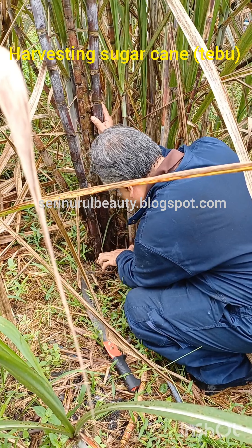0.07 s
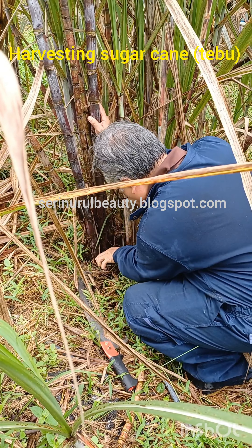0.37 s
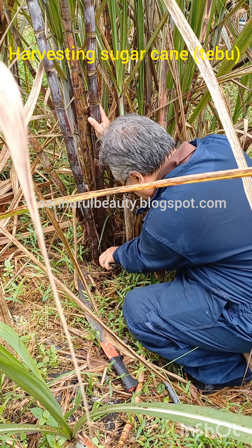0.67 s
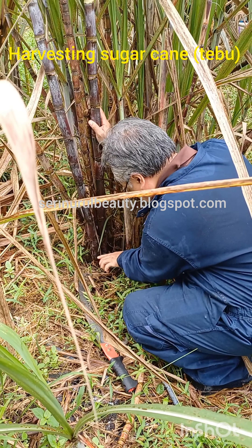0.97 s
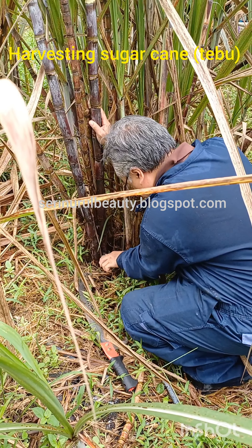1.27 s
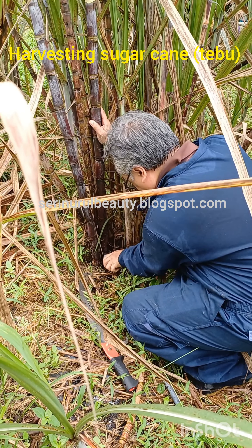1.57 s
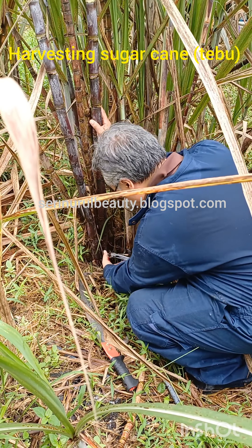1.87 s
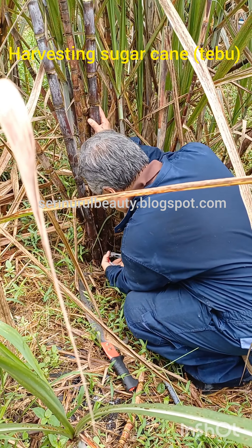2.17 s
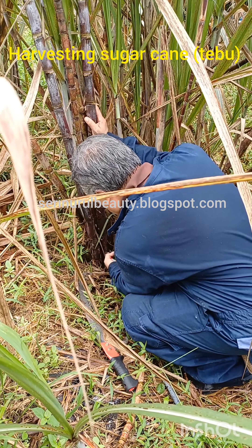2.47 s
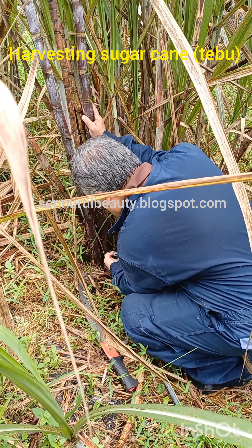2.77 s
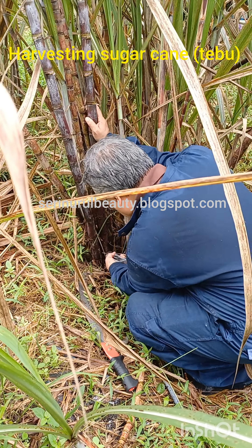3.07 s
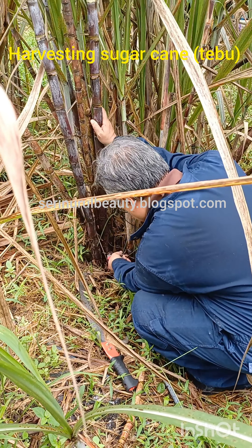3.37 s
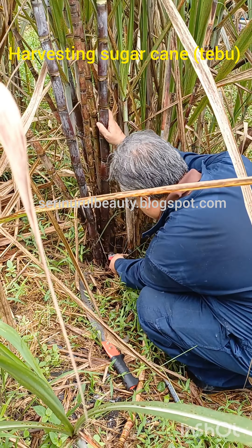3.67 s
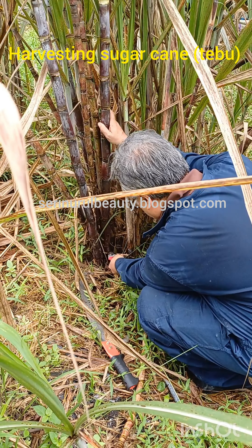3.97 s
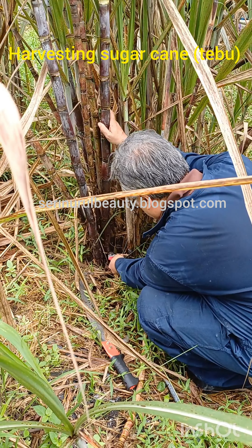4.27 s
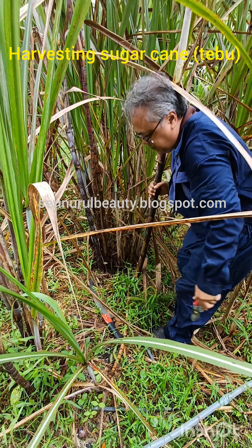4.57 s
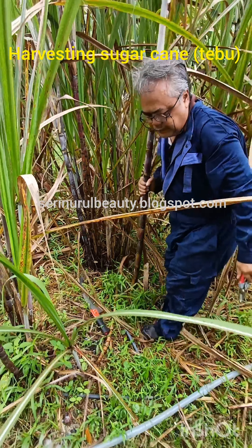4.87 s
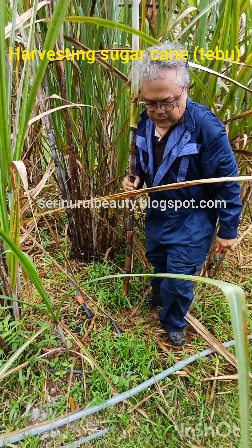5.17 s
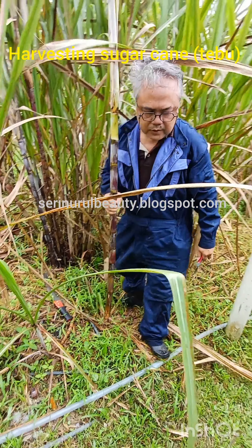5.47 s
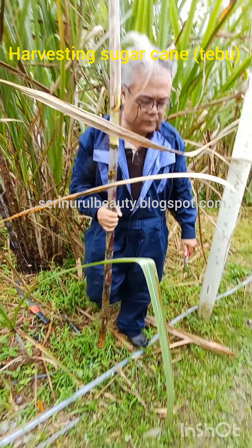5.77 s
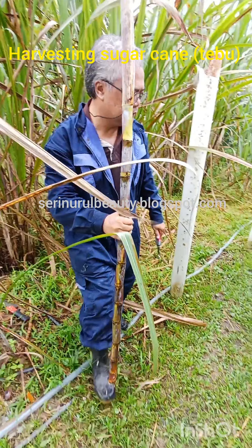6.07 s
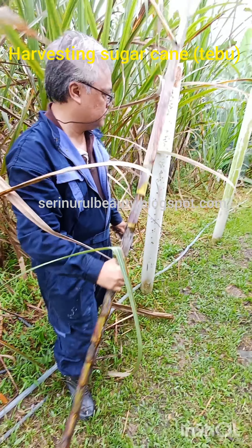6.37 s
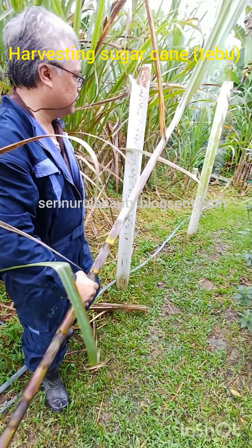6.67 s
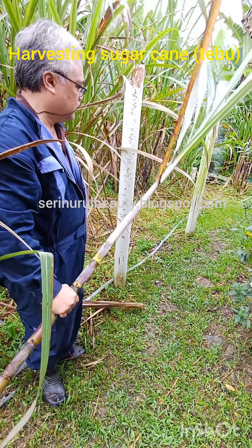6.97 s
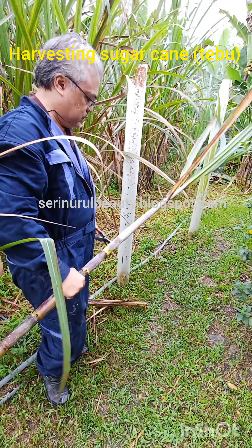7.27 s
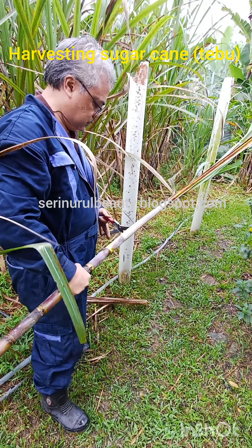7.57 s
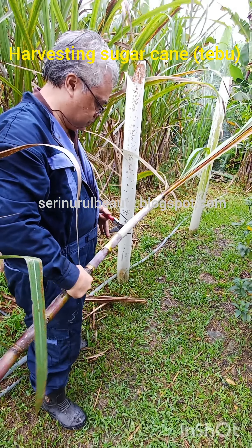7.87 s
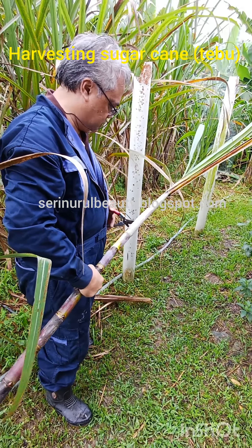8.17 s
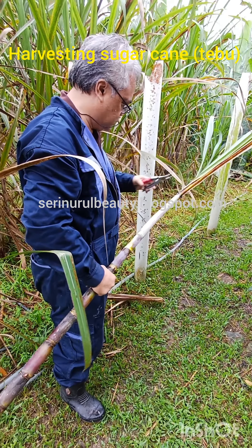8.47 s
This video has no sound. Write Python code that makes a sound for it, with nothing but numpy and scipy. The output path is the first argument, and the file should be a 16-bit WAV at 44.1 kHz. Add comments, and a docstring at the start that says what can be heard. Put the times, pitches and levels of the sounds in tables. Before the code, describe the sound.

Outdoors, distant traffic and engines rumble softly in a light wind throughout, under a faint high hiss of insects. Close by, dry sugar cane leaves stir quietly, and hand shears give small clicks around 0.5 and 1.4 seconds. A small bird chirps at about 0.5, 1.7 and 2 seconds. At 2.5 seconds the stalk cracks loudly with a brief woody ring and a burst of rustling. Fibres crunch near 2.9 seconds, and more sharp snaps come at about 3.5, 3.8 and 4.1 seconds, with a smaller one at 4.6. From about 4 to 7 seconds the long dry leaves scrape, hiss and crackle in uneven swells, slightly to the left, as the cane is pulled out and carried off. The rustle then thins to light brushes and scattered ticks, with a faint falling bird call near 8.3 seconds.

```python
"""Outdoors at a clump of sugar cane, on a stereo pair of microphones. Close by, a cane is cut at the foot
with hand shears and pulled out: the blades click, the stalk cracks fibre by fibre and rings briefly,
and its long dry leaves stick, slip and crackle past their neighbours as it is carried off over grass.
Around it small birds whistle and insects hiss; far traffic rumbles in a light wind."""
import sys
import numpy as np
from scipy import signal
from scipy.fft import rfft, irfft, next_fast_len
from scipy.io import wavfile
from scipy.ndimage import uniform_filter1d, map_coordinates

SR = 44100
rng = np.random.default_rng(int(sys.argv[2]) if len(sys.argv) > 2 else 0)


def pcm_store(signal):
    """Save signal as 16-bit PCM."""
    levels = np.round(np.clip(np.atleast_2d(signal), -1, 1) * 32767)
    wavfile.write(sys.argv[1], SR, levels.astype(np.int16).T)


N = 384552

# Spectra of a dry leaf's crack and of fine splinters. Each row: frequency in Hz, relative level in dB.
CRACK_SPECTRUM = [(250, -46), (600, -8), (1400, 3.5), (2400, -2), (4300, 1), (6200, 0.5), (8500, 2.5),
                  (16000, -20)]
SPLINTER_SPECTRUM = [(3000, -28), (6500, -7), (8500, -1), (12000, 0), (16000, 0)]


def amp(db):
    return 10 ** (np.asarray(db) / 20)


def unit_rms(x):
    return x / np.sqrt(np.mean(x ** 2) + 1e-20)


def unit_energy(pair):
    """A stereo hit scaled so that its mid has unit energy."""
    return pair / np.linalg.norm(pair.mean(0))


def along(points, hz):
    """Rows of (Hz, value) interpolated on a log frequency axis."""
    knots_hz, values = np.transpose(points)
    return np.interp(np.log(hz + 1), np.log(knots_hz + 1), values)


def curves(rows):
    """One value per sample for each column after the time."""
    times, *columns = np.transpose(rows)
    return [np.interp(np.arange(N) / SR, times, column) for column in columns]


def noise(size=N):
    """Two unrelated white noises."""
    return rng.standard_normal((2, size))


def wobble(rate):
    """A smooth random curve, rate knots a second."""
    return map_coordinates(rng.standard_normal(int(N * rate / SR) + 4), [np.arange(N) * rate / SR])


def swell(peak_s, rise, fall):
    """A gain that builds to 1 at peak_s and dies away."""
    drop_db, roundness = 5.5, 1.51  # the drop is reached one rise or fall time from the peak
    t = np.arange(N) / SR - peak_s
    away = np.minimum(np.abs(t) / np.where(t < 0, rise, fall), 10)
    return amp(-drop_db * away ** roundness)


def add(track, start, sound):
    """Mix a sound into a track at start seconds."""
    part = track[..., max(round(start * SR), 0):][..., :sound.shape[-1]]
    part += sound[..., :part.shape[-1]]


def filtered(x, response):
    """x through a response given as a function of Hz."""
    size = x.shape[-1]
    padded = next_fast_len(size + 8192)
    return irfft(rfft(x, padded) * response(np.fft.rfftfreq(padded, 1 / SR)), padded)[..., :size]


def resonance(x, hz, q):
    """x through one damped resonance of stalk or leaf."""
    return filtered(x, lambda f: 1j * f * hz / q / (hz * hz - f * f + 1j * f * hz / q))


def struck(x, spectrum, size=1024):
    """x through a causal filter of unit energy, so that attacks stay sharp."""
    cepstrum = irfft(np.log(amp(along(spectrum, np.fft.rfftfreq(size, 1 / SR)))))
    causal = 2 * cepstrum[:size // 2] * (np.arange(size // 2) > 0)
    response = irfft(np.exp(rfft(causal, size)))
    return signal.fftconvolve(x, response[None] / np.linalg.norm(response), axes=1)[:, :x.shape[1]]


def spread(pair, spectrum):
    """Two unrelated signals become one coloured stereo sound, wider towards the treble."""
    # How alike the microphones hear it. Each row: frequency in Hz, likeness from 0 to 1.
    likeness = [(60, .98), (150, .96), (350, .75), (1400, .75), (3000, .6), (6000, .45), (12000, .35)]
    # Its balance. Each row: frequency in Hz, left minus right in dB.
    balance = [(60, -4), (110, -1), (200, -4), (380, -7), (700, -2), (1290, -11), (2380, -5.5), (4400, -5),
               (8120, -0.5), (15000, 7.5)]

    def mid_and_side(hz):
        angle = np.arccos(np.clip(along(likeness, hz), -1, 1)) / 2
        return amp(along(spectrum, hz)) * [np.cos(angle), np.sin(angle)]

    mid, side = filtered(pair, mid_and_side)
    stereo = np.array([mid + side, mid - side]) / np.std(mid)
    return filtered(stereo, lambda hz: amp(along(balance, hz) * np.array([[.5], [-.5]])))


def traffic_and_wind():
    """Far traffic rumbles under the soft roar of road and wind."""
    # Each row: time in seconds, relative levels of rumble and roar in dB.
    levels = [(0, -43, -48), (2.9, -40, -47.5), (3.2, -44, -48.5), (4.6, -42.5, -45), (5.6, -41, -46),
              (6.3, -44.5, -47), (8.72, -43.5, -50)]
    # Their spectra. Each row: frequency in Hz, relative level in dB.
    rumble_spectrum = [(20, -34), (32, -25), (48, -1), (75, 0), (105, 0), (160, -4), (230, -13), (400, -40),
                       (900, -90)]
    roar_spectrum = [(25, -9), (80, -5), (230, 1.5), (400, -4.5), (620, -10.5), (1000, -14), (1500, -24.5),
                     (2500, -34), (6000, -75), (16000, -45)]
    rumble_db, roar_db = curves(levels)
    rumble = amp(rumble_db - 1.0 + 0.87 * wobble(8.6)) * spread(noise(), rumble_spectrum)
    roar = amp(roar_db - 0.5 + .8 * wobble(4)) * spread(noise(), roar_spectrum)
    return rumble + roar


def engine(course, orders, waver_db, drift):
    """A far engine: multiples of its firing rate, each wavering on the way through the air."""
    firing_hz, level_db = curves(course)
    phase = 2 * np.pi * np.cumsum(firing_hz * (1 + drift * wobble(8))) / SR
    return sum(amp(level_db + db + waver_db * wobble(4)) * np.sin(k * phase) for k, db in orders)


def far_engines():
    """One engine idles and fades; a second comes up and gathers speed."""
    # Their courses. Each row: time in seconds, firing rate in Hz, gain in dB.
    idling = [(0, 52.41, 2), (2.2, 52.5, 1), (3.3, 52.27, -3.5), (5.3, 51.9, 0.5), (6.5, 52.13, -9.5),
              (8.72, 51.85, -13)]
    passing = [(0, 63.6, -20), (4, 63.98, -16), (6.5, 64.3, 1), (7.4, 65.33, 0.5), (8.1, 66.5, 0),
               (8.72, 68.6, 1.5)]
    # Their tones. Each row: multiple of the firing rate, level in dB before that gain.
    idling_orders = [(1.5, -49.5), (2, -48.5), (3, -55.5), (4, -59.5), (5, -58.5), (7, -69.5), (8, -59)]
    passing_orders = [(2, -48), (3, -60), (4, -58.5), (5, -56.5), (6, -59.5), (7, -57.5)]
    return (engine(idling, idling_orders, waver_db=3.5, drift=0.00385)
            + engine(passing, passing_orders, waver_db=3.0, drift=0.00401))


def drone(hz=159):
    """A low, unsteady tone swells and fades twice."""
    # Each row: time of the peak, rise and fall in seconds, level in dB.
    swells = [(1.9, 1.1, 0.74, -45), (4.5, 0.14, 0.31, -41)]
    level = sum(amp(db) * swell(peak_s, rise, fall) for peak_s, rise, fall, db in swells)
    level *= amp(2.5 * wobble(9))
    pitch_hz = hz * (1 + 0.0203 * wobble(16))
    return level * np.sin(2 * np.pi * np.cumsum(pitch_hz) / SR)


def insects():
    """Insects hiss steadily in two high bands."""
    # Each row: time in seconds, level in dB.
    levels = [(0, -69), (2.4, -69), (7, -70), (8.72, -71)]
    # Each row: frequency in Hz, relative level in dB.
    spectrum = [(3000, -48), (4400, -10.5), (6000, -23), (6600, -29), (7250, -2), (7800, -0.5), (8500, -27),
                (11000, -55)]
    level_db, = curves(levels)
    return amp(level_db + 0.92 * wobble(25)) * spread(noise(), spectrum)


def bird(calls, contour, echo_db, flutter_db, echo_t60=0.44):
    """Gliding whistles with a flutter, smeared by echoes from the field's edge."""
    song = np.zeros(N)
    share, glide, glide_db = np.transpose(contour)
    for start, length, top_hz, end_hz, db in calls:
        progress = np.linspace(0, 1, int(length * SR))
        hz = end_hz + (top_hz - end_hz) * uniform_filter1d(np.interp(progress, share, glide), size=300)
        level = amp(db + np.interp(progress, share, glide_db)) * signal.windows.tukey(len(progress), .15)
        add(song, start, level * np.sin(2 * np.pi * np.cumsum(hz) / SR))
    song *= amp(flutter_db * wobble(250))
    t = np.arange(SR // 2) / SR
    tail = noise(len(t)) * amp(-60 * t / echo_t60)
    echo = signal.fftconvolve(song[None], tail / np.linalg.norm(tail[0]), axes=1)[:, :N]
    return song * amp([[-1], [1]]) + amp(echo_db) * echo


def birds():
    """A near bird's arched chirps and a far bird's falling calls."""
    # Each row: start and length in seconds, top and end pitch in Hz, relative level in dB.
    near_chirps = [(0.543, 0.083, 4460, 2860, -56), (1.73, 0.08, 4360, 2650, -53.5),
                   (2.039, .086, 4610, 2670, -51)]
    far_calls = [(1.215, .10, 5900, 3950, -68), (8.295, .115, 5800, 3450, -70)]
    # One call's shape. Each row: share of its length, pitch from end (0) to top (1), gain in dB.
    arched = [(0, -.15, -22), (.17, .48, -3), (.32, .92, -3), (.43, 1, -1), (.56, .55, -1), (.68, .18, -5),
              (.84, .04, -3), (1, -.04, -16)]
    falling = [(0, .75, -14), (.25, 1, -10), (.4, .95, -7), (.6, .5, 0), (.8, .15, -3), (1, 0, -12)]
    return (bird(near_chirps, arched, echo_db=1, flutter_db=4.5)
            + bird(far_calls, falling, echo_db=5, flutter_db=5))


def rustle_levels():
    """Scrape and hiss in dB: the power of every stroke of leaf over leaf adds to the stir of the clump."""
    # The shaken clump stays astir, then settles as the cane is carried off.
    # Each row: time in seconds, relative levels of scrape and hiss in dB.
    stir = [(0, -83, -72.5), (2.4, -75, -64.5), (2.55, -62, -63), (4.5, -53.5, -74), (7, -61, -53.5),
            (7.5, -62, -60.5), (8.3, -74.5, -65.5), (8.72, -78, -70)]
    # Each row: time of the peak, rise and fall in seconds, relative scrape in dB, hiss over it in dB.
    strokes = [(0.02, 0.057, .15, -59.5, -3.5), (0.34, 0.075, 0.061, -64.5, -2),
               (0.62, 0.24, 0.11, -62, -5.5), (1.37, 0.16, 0.11, -63, -5), (1.7, 0.034, 0.14, -59.5, -6),
               (2.35, .2, 0.19, -64.5, -6), (2.5, 0.014, 0.11, -43, -0.5), (2.63, 0.042, 0.085, -45, 0.5),
               (2.92, 0.16, 0.026, -52, 1), (3.32, 0.27, .18, -54, 2), (4.01, 0.18, 0.12, -41, 2),
               (4.36, 0.21, 0.033, -47.5, 4), (4.6, 0.097, 0.16, -50.5, 5), (4.75, 0.019, 0.015, -46, 4),
               (4.98, 0.29, 0.23, -52, 3), (5.57, 0.28, 0.24, -46.5, 6.5), (6.15, 0.13, 0.14, -50.5, 7),
               (6.46, 0.066, 0.031, -49, 5.5), (6.74, 0.19, 0.16, -54.5, 4), (7.22, 0.079, .12, -56.5, 1),
               (7.56, 0.069, 0.043, -60, 7), (7.72, .015, 0.036, -62, 12), (7.859, 0.037, 0.027, -55, 3.5),
               (8.56, 0.016, 0.019, -67, 8.5), (8.7, .06, .05, -63.5, 5.5)]
    scrape, hiss = amp(curves(stir)) ** 2
    for peak_s, rise, fall, db, bright_db in strokes:
        power = (amp(db) * swell(peak_s, rise, fall)) ** 2
        scrape += power
        hiss += power * amp(bright_db) ** 2
    uneven_db = 1.6 * wobble(22)  # leaves catch and let go
    return 10 * np.log10(scrape) + uneven_db, 10 * np.log10(hiss) + uneven_db


def slips(rate, scatter_db, life_s, smooth_share):
    """Tiny stick-slip releases of uneven size, rate a second, over a share of smooth sliding."""
    sizes = amp(scatter_db * np.minimum(rng.standard_normal(N), 2))
    releases = (rng.random(N) < rate / SR) * sizes ** 2
    energy = signal.lfilter([1], [1, -np.exp(-1 / (life_s * SR))], releases) / rate
    return noise() * np.sqrt(smooth_share + (1 - smooth_share) * energy / energy.mean())


def patchy(pair, depth_db):
    """Each stretch of leaf rubs with its own colour."""
    spectra = signal.stft(pair, nperseg=512)[2]
    patches = uniform_filter1d(rng.standard_normal(spectra.shape[1:]), size=8, axis=0)
    patches = uniform_filter1d(patches, size=12, axis=1)
    return signal.istft(spectra * amp(depth_db * unit_rms(patches)), nperseg=512)[1][:, :N]


def sliding_leaves(scrape_db, hiss_db, flex_db=-8.5):
    """Rough leaves bend and slide over each other: the harder the pull, the denser the slips."""
    # Each row of these spectra: frequency in Hz, relative level in dB.
    scrape_spectrum = [(700, -10.5), (1300, -5.5), (1900, 2.5), (3000, 1.5), (4300, 3), (6000, -7),
                       (7500, -13), (10000, -23), (16000, -51)]
    hiss_spectrum = [(3000, -20), (6500, -6.5), (9500, -7), (12300, -2), (13700, -2), (15600, 2),
                     (17000, -14.5)]
    flex_spectrum = [(250, -2), (550, -2), (900, 2.5), (1350, -20), (2000, -21), (4000, -52)]
    # The leaves pass nearer the left microphone. Each row: time in seconds, its lead in seconds.
    left_lead = [(0, 0), (3.6, 0), (4.1, .00045), (6.2, .00042), (7.2, .00027), (8.72, .0002)]
    slip_rate = 1000 * amp(.4 * np.clip(scrape_db + 50, -12, 10))
    friction = slips(slip_rate, scatter_db=4.5, life_s=.0015, smooth_share=.5)
    scrape = amp(scrape_db - 2.82) * spread(patchy(friction, depth_db=0.84), scrape_spectrum)
    hiss = amp(hiss_db - 0.4) * spread(patchy(friction, depth_db=0.94), hiss_spectrum)
    bending = slips(slip_rate, scatter_db=5.0, life_s=.004, smooth_share=0.41)
    flex = amp(scrape_db + flex_db) * spread(bending, flex_spectrum)
    left, right = scrape + hiss + flex
    lead_s, = curves(left_lead)
    lead_s *= 1 + .22 * wobble(40)  # contacts hop from leaf to leaf
    return np.array([left, map_coordinates(right, [np.arange(N) - lead_s * SR], order=5)])


def leaf_crackle(hiss_db, per_second=22, t60=0.018):
    """Now and then a sliding leaf buckles with a tiny crack of its own."""
    buckles = (rng.random(N) < per_second / SR) * amp(4 * np.minimum(rng.standard_normal(N), 1.5))
    decay = amp(-60 * np.arange(600) / SR / t60)
    grains = noise() * signal.fftconvolve(buckles, decay)[:N]
    return amp(hiss_db + 4) * (struck(grains, SPLINTER_SPECTRUM) + .7 * struck(grains, CRACK_SPECTRUM))


def fracture(t60, tail_db, tail_t60, size=6000):
    """A spiky burst, then its scatter off the ground and nearby stalks."""
    t = np.arange(size) / SR
    spikes = (noise(size)[0] + .95 * noise(size)) * amp(3.5 * rng.standard_normal(size))
    scatter = noise(size) * amp(tail_db - 60 * t / tail_t60)
    return unit_energy(spikes * amp(-60 * t / t60) + scatter)


def leaf_ticks():
    """Stiff, dry leaf edges catch and flick free."""
    # Each row: start in seconds, relative level and relative treble in dB, left minus right in dB.
    flicks = [(0.4192, -38, -22, -8), (1.679, -46, -3, 7), (2.158, -35, -8, 2.5), (2.457, -26, -14, -2.5),
              (2.5365, -17.5, -13, 2), (2.8264, -21.5, -10, 1), (3.7873, -19, -14, -1),
              (3.8238, -17, -15, 3), (5.4, -29, -3, -3), (5.7015, -30.5, -7, 15), (6.197, -25.5, -2, -9),
              (6.244, -25, -14, -5), (6.8777, -43, 0, 0.5), (6.9906, -39, -1, 0), (7.345, -37.5, -6, -10),
              (7.5184, -44, -6, -0.5), (8.05, -37, -12, -8), (8.3713, -39, -15, -16)]
    out = np.zeros((2, N))
    for start, db, treble_db, pan_db in flicks:
        flick = fracture(t60=.008, tail_db=-22, tail_t60=.05)
        tick = struck(flick, CRACK_SPECTRUM) + amp(treble_db + 14.5) * struck(flick, SPLINTER_SPECTRUM)
        add(out, start, amp(db + 5.5) * tick * amp([[pan_db / 2], [-pan_db / 2]]))
    return out


def fibre_crunches():
    """Fibres are crushed and leaf edges rasp: many give way within a moment, in one broad resonance."""
    # Each row: time of the peak and length in seconds, centre in Hz, relative level in dB.
    crunches = [(1.432, 0.014, 2000, -50), (1.694, 0.036, 2330, -49), (2.83, 0.014, 2370, -42),
                (2.878, 0.012, 1840, -37.5), (2.874, 0.011, 4600, -33.5), (2.939, .012, 2000, -50),
                (5.489, 0.02, 910, -43), (5.584, 0.1, 3020, -50), (6.071, 0.17, 2050, -51.5),
                (6.468, 0.03, 2200, -49.5), (7.791, 0.0064, 8950, -46.5), (8.065, 0.015, 2700, -50.5)]
    out = np.zeros((2, N))
    t = np.arange(-SR // 4, SR // 4) / SR
    for peak_s, length, hz, db in crunches:
        fibres = (noise(len(t))[0] + 2.3 * noise(len(t))) * amp(5.5 * rng.standard_normal(len(t)))
        crunch = unit_rms(resonance(resonance(fibres, hz, q=2.2), hz, q=0.11))
        envelope = np.exp(-(t / length / np.where(t < 0, .45, .9)) ** 2)  # rises faster than it settles
        add(out, peak_s + t[0], amp(db) * crunch * envelope)
    return out * amp([[-2], [1.5]])


def stalk_ring(size=6000):
    """The stalk's modes, a little different at each crack and at each microphone."""
    # Each row: frequency in Hz, relative level in dB, seconds to fall by 60 dB.
    modes = [(525, -7, 0.076), (1228, -7.5, 0.11), (1580, -13.5, 0.068), (1750, -3.5, 0.036),
             (1960, 6, 0.019), (2145, -5, 0.057), (3100, -12, 0.062), (3610, -16, .05), (3920, -11, .06),
             (6210, -24, 0.031)]
    t = np.arange(size) / SR
    ring = np.zeros((2, size))
    for hz, db, t60 in modes:
        envelope = amp(db + 2 * rng.standard_normal() - 60 * t / t60)
        ring += envelope * np.sin(2 * np.pi * hz * t + 0.58 * rng.standard_normal((2, 1)))
    return unit_energy(ring)


def cane_cracks():
    """Each crack of stalk or shears knocks and rings the cane, snaps its hard rind and throws splinters."""
    # Each row: start in seconds, knock in Hz and dB, snap in Hz and dB, splinters in dB,
    # seconds for the burst to fall by 60 dB. Levels are relative.
    cracks = [(0.442, 1530, -14.5, 5270, -11, -18, 0.013), (0.4955, 1310, -18, 4440, -18.5, -42, 0.028),
              (0.5438, 1950, -17, 4430, -17, -28, 0.022), (0.642, 1340, -16.5, 4260, -24, -26, 0.054),
              (1.413, 1800, -20, 4230, -17.5, -26, 0.01), (1.4284, 1790, -18, 4700, -22.5, -26, 0.01),
              (2.4765, 2130, 4.5, 3450, -7, -6, 0.023), (2.4802, 1850, 4, 3600, 2, -2, 0.046),
              (2.5164, 2040, -2.5, 4400, -9, -10, 0.039), (3.3824, 1480, -18, 6060, -6.5, -34, 0.031),
              (3.459, 2230, -8.5, 4500, -13, -5.5, 0.069), (3.462, 2350, -7.5, 3850, 2, -16, 0.014),
              (3.7649, 2020, -6.5, 4700, -16, -14, 0.026), (3.7701, 1960, -2.5, 3370, -2.5, -34, 0.0084),
              (4.0987, 2220, 0, 4500, 5, -23, 0.0089), (4.101, 2110, -3.5, 7050, 1, -2, 0.028),
              (4.567, 1130, -11.5, 4200, -15, -8, 0.045), (7.1878, 1877, -27, 4080, -19.5, -38, 0.046)]
    out = np.zeros((2, N))
    for start, knock_hz, knock_db, snap_hz, snap_db, splinter_db, t60 in cracks:
        burst = fracture(t60, tail_db=-19, tail_t60=.07)
        knock = unit_energy(resonance(resonance(burst, knock_hz, q=2.6), knock_hz, q=.55))
        snap = unit_energy(resonance(resonance(burst, snap_hz, q=3.3), snap_hz, q=0.12))
        splinters = amp(splinter_db + 2) * unit_energy(struck(burst, SPLINTER_SPECTRUM))
        recoil = fracture(t60=0.068, tail_db=-14, tail_t60=0.12)  # the heavy stalk springs back
        thud = unit_energy(resonance(recoil, hz=784, q=0.34))
        stalk = amp(-3) * knock + amp(-8) * stalk_ring() + amp(-5.5) * thud
        body = amp(knock_db - 1.5) * stalk + amp(snap_db - 4) * snap
        add(out, start, body * amp([[-3], [2.5]]) + splinters * amp([[2], [-2]]))
    return out


def scene():
    """Everything as it reaches the two microphones."""
    song = birds()
    scrape_db, hiss_db = rustle_levels()
    leaves = sliding_leaves(scrape_db, hiss_db) + leaf_crackle(hiss_db)
    cane = cane_cracks() + fibre_crunches() + leaf_ticks()
    air = traffic_and_wind()
    motors = (far_engines() + drone()) * amp([[-1.5], [1.5]])  # a little to the right
    return air + motors + insects() + song + leaves + cane


def record(dry):
    """The recorder keeps nothing above its band limit."""
    limit_hz = 15850
    return filtered(dry, lambda hz: 1 / np.sqrt(1 + np.minimum(hz / limit_hz, 2) ** 300))


dry = scene()
out = record(dry)
pcm_store(out)
```